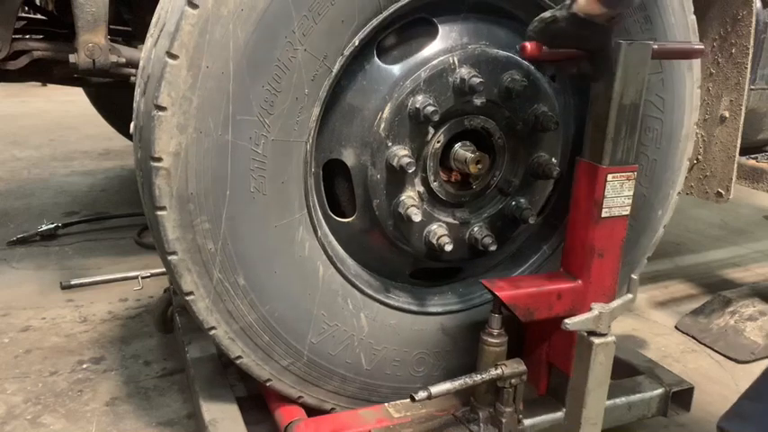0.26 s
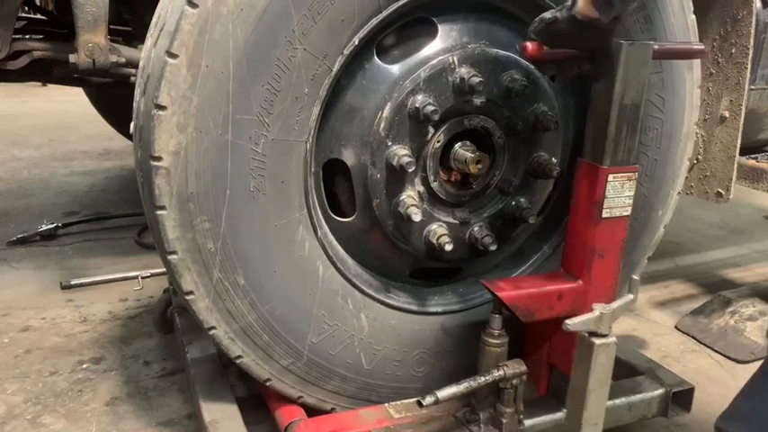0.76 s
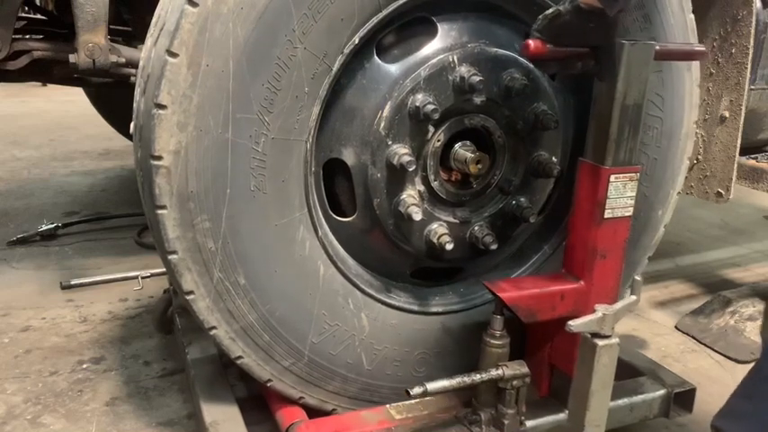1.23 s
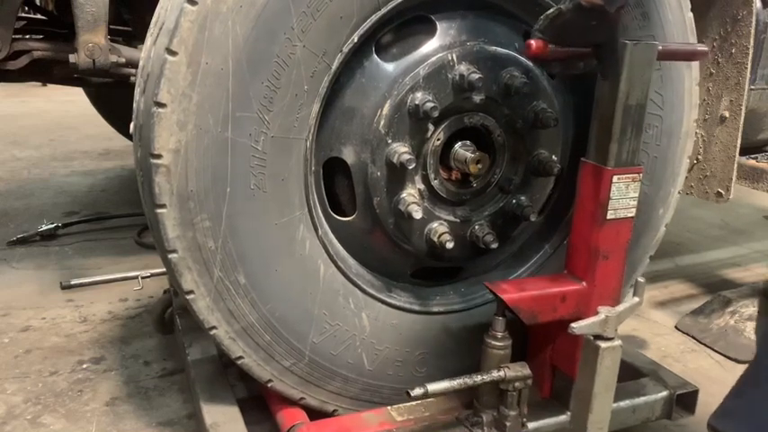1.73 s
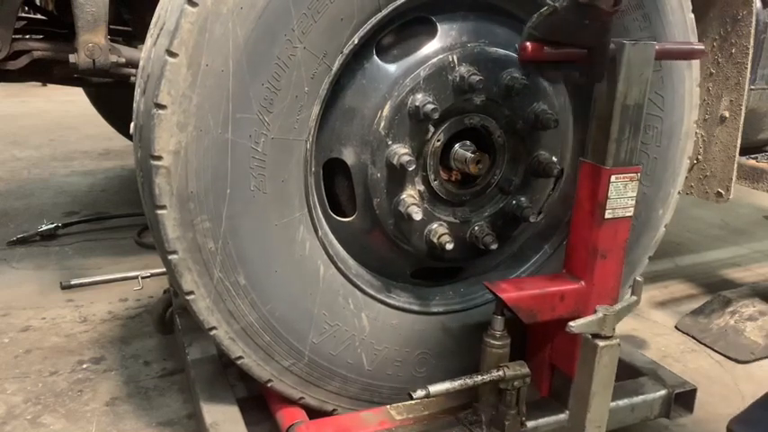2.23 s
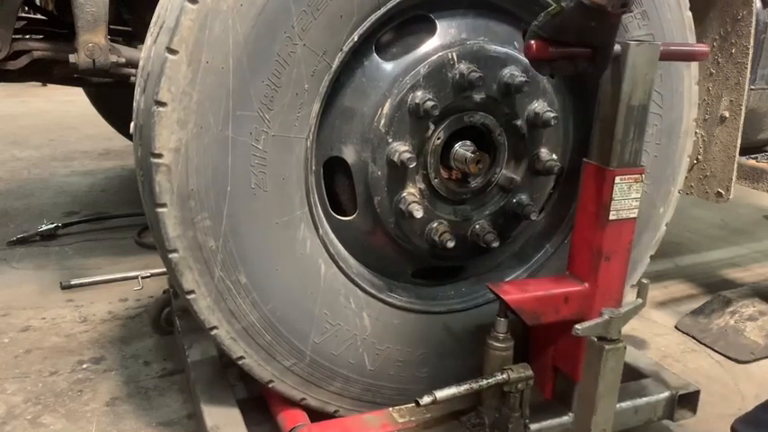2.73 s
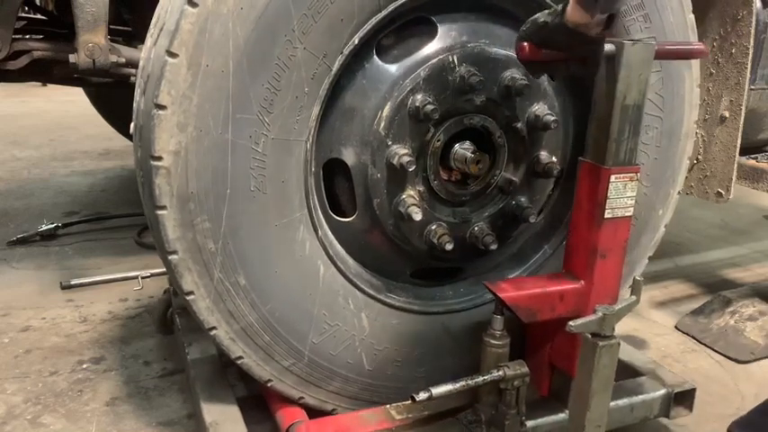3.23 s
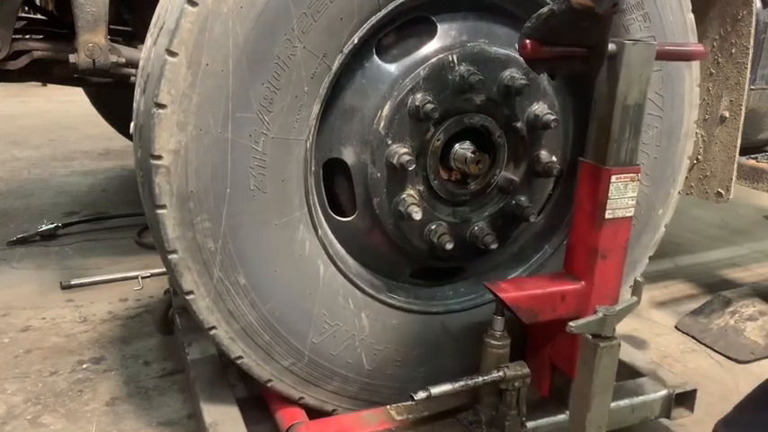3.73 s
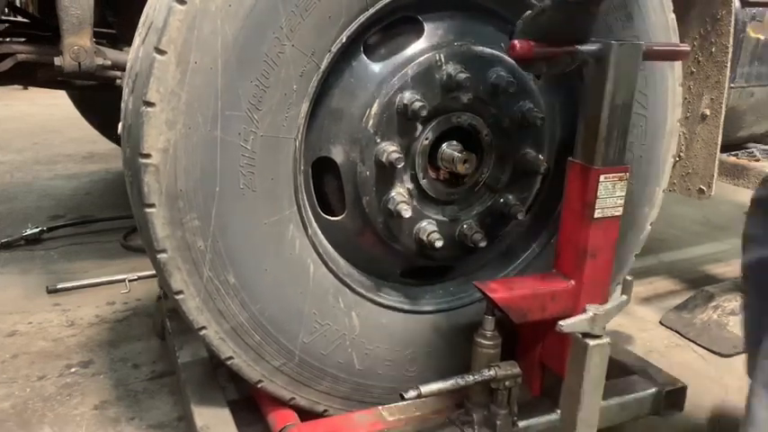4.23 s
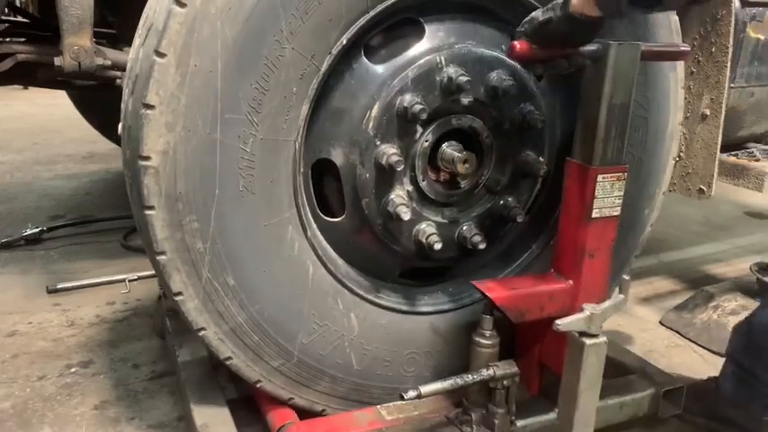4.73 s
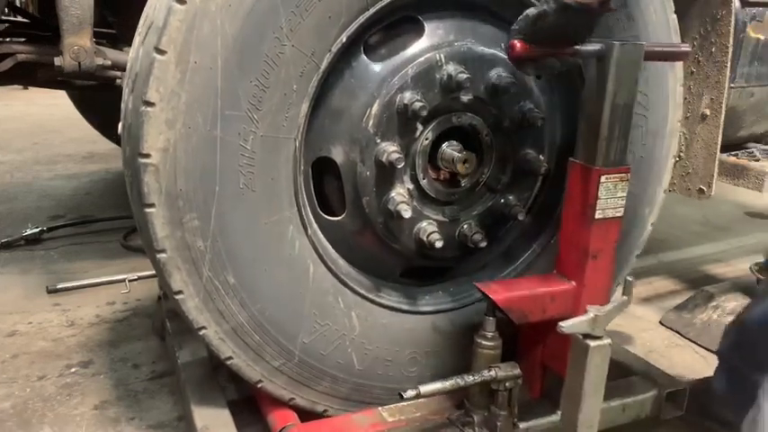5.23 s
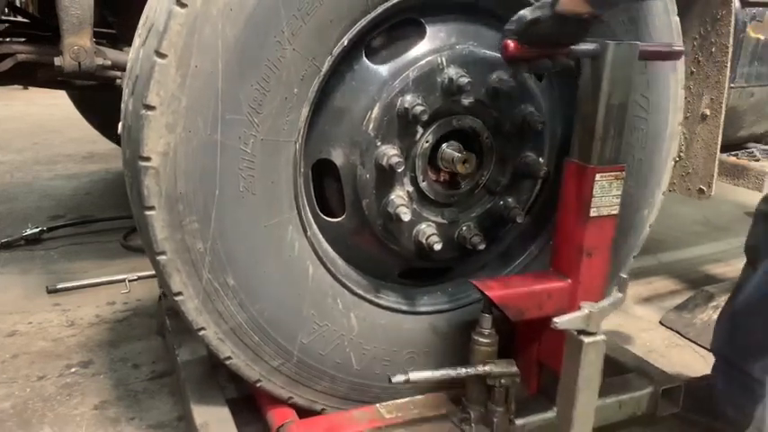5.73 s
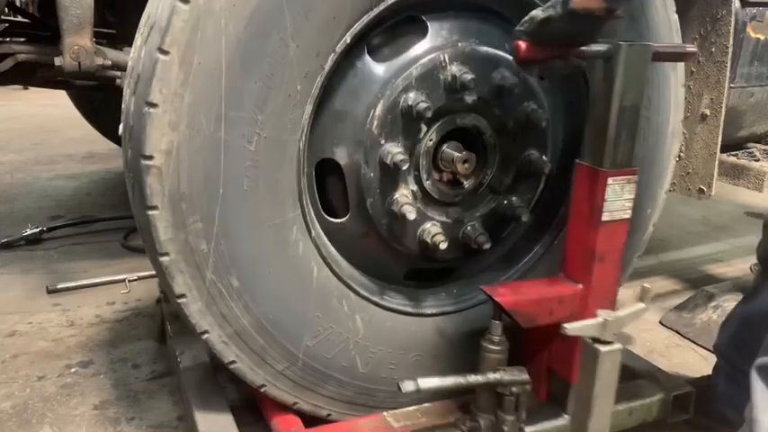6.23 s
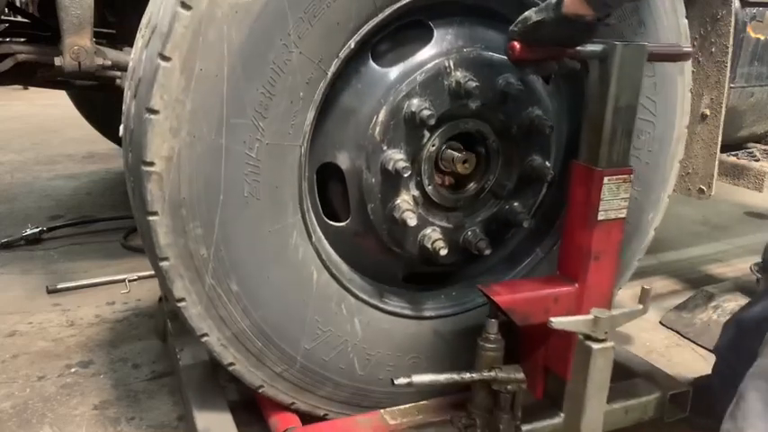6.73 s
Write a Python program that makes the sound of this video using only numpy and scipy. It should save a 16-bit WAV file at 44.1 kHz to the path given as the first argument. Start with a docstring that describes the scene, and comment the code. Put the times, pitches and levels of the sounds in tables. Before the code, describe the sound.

Close to the microphone in a reverberant workshop, a jack dolly is worked under a truck wheel. Steel linkage clanks back and forth in the first second and a half, with frame knocks, small creaks and dull tyre thuds. It nearly hushes to cloth rustle and faint hiss, then picks up from about three and a half seconds and ends in dense, hard clanks and knocks with two tiny groans.

```python
"""Truck wheel on a jack dolly

A truck wheel is worked up on a hydraulic jack dolly in a workshop, close to the microphone.
Micro-impacts excite resonances: the loose steel pump linkage clanks, the frame knocks, the big tyre thuds.
Stick-slip makes the frame creak and groan twice; shaped noise makes the tyre's boom and rustling work clothes.
The hall answers with a diffuse tail over a faint hiss, and the level dips briefly once."""
import sys
import numpy as np
from scipy import signal
from scipy.fft import rfft, irfft, next_fast_len
from scipy.io import wavfile
from scipy.ndimage import uniform_filter1d, map_coordinates

SR = 44100
rng = np.random.default_rng(int(sys.argv[2]) if len(sys.argv) > 2 else 0)


def store_wav(level_fs):
    """Save 16-bit WAV to argv[1]."""
    pcm = np.round(np.clip(np.atleast_2d(level_fs), -1, 1) * 32767)
    wavfile.write(sys.argv[1], SR, pcm.T.astype(np.int16))


N = 307377
PRE_S = .03  # room for the scrape ahead of each blow
DIP_S = 4.118  # centre of the brief level dip; the handle's joint ring and the echo stop here


def amp(db):
    """Logarithmic level: decibels to amplitude gain."""
    return 10 ** (np.asarray(db) / 20)


def unit(x):
    """Energy normalisation: scale to rms 1."""
    return x / np.sqrt(np.mean(x ** 2) + 1e-20)


def crest(x, size=700):
    """Short-time energy: scale so that the loudest moment has rms 1."""
    power = uniform_filter1d(np.mean(x ** 2, 0), size)
    return x / np.sqrt(power.max() + 1e-20)


def along(points, hz):
    """Logarithmic pitch scale: interpolate (frequency, value) points on it."""
    f, v = np.transpose(points)
    return np.interp(np.log(hz + 1), np.log(f + 1), v)


def envelope(rows):
    """Piecewise linear envelope: one value per sample from (time, value) rows."""
    s, values = np.transpose(rows)
    return np.interp(np.arange(N) / SR, s, values)


def wobble(rate, size=N):
    """Slow random modulation: a smooth curve with rate knots a second."""
    knots = rng.standard_normal(int(size * rate / SR) + 4)
    return map_coordinates(knots, [np.arange(size) * rate / SR])


def filtered(x, response):
    """Linear filtering: the spectrum of x times a complex frequency response."""
    n = x.shape[-1]
    m = next_fast_len(n + 8192)
    return irfft(rfft(x, m) * response(np.fft.rfftfreq(m, 1 / SR)), m)[..., :n]


def body(modes):
    """Modal superposition: response of (frequency, bandwidth, level) resonances of alternating sign."""
    def response(f):
        return sum((-1) ** k * amp(db) * 1j * f * width / (centre * centre - f * f + 1j * f * width)
                   for k, (centre, width, db) in enumerate(modes))
    return response


def band(x, lo_hz, hi_hz, order=3):
    """Causal Butterworth band-pass."""
    edges = [lo_hz, min(hi_hz, SR / 2 - 1)]
    return signal.sosfilt(signal.butter(order, edges, "band", fs=SR, output="sos"), x)


# left-right correlation of the sound field: (frequency [Hz], correlation [-1 to 1])
CORRELATION = [(60, 0.98), (120, 0.87), (250, 0.4), (520, 0.7), (1000, -0.63), (2200, 0.1), (4400, -0.25),
               (9000, 0.11)]


def spread(pair):
    """Interaural coherence: two unrelated signals become left and right, correlated by frequency."""
    def mid_side(hz):
        turn = np.arccos(np.clip(along(CORRELATION, hz), -1, 1)) / 2
        return np.array([np.cos(turn), np.sin(turn)])
    mid, side = filtered(pair, mid_side)
    return np.array([mid + side, mid - side])


def noise(spectrum):
    """Coloured noise: random stereo hiss of rms 1 with the given spectrum."""
    coloured = filtered(rng.standard_normal((2, N)), lambda hz: amp(along(spectrum, hz)))
    return unit(spread(coloured))


def random_gain(x, depth_db=4.5):
    """Time-frequency modulation: give noise a random gain that varies over time and frequency."""
    z = signal.stft(x, nperseg=1024)[2]
    field = uniform_filter1d(rng.standard_normal(z.shape[1:]), size=4, axis=0)
    field = uniform_filter1d(field, size=5, axis=1)
    return unit(signal.istft(z * amp(depth_db * unit(field)), nperseg=1024)[1][:, :N])


def add(track, s, sound):
    """Superposition: mix a sound into a track at time s."""
    start = max(round(s * SR), 0)
    part = track[:, start:start + sound.shape[-1]]
    part += sound[..., :part.shape[-1]]


def chatter(lead_s, t60_s, grit_db, lead_db=-16, size=12288):
    """Contact force: a scrape swells into the blow, then uneven micro-impacts decay exponentially."""
    t = np.arange(size) / SR - PRE_S
    sizes = amp(grit_db * np.repeat(rng.standard_normal(size // 32), 32))
    scrape = amp(lead_db - 20 * np.abs(t) / lead_s)  # 20 dB in each lead_s
    blow = np.clip(t / .001, 0, 1) * amp(-60 * np.maximum(t - .002, 0) / t60_s)
    return spread(rng.standard_normal((2, size)) * sizes * np.maximum(scrape, blow))


def nearest(modes, hz):
    """Modal selection: the mode that lies closest to a pitch."""
    return min(modes, key=lambda mode: abs(mode[0] - hz))


def sing(hz, t60_s, size=16384):
    """Free decay of one mode: it rings on while the chafing contact roughens its pitch and level."""
    t = np.arange(size) / SR
    chafe = np.array([wobble(70, size=size), wobble(70, size=size)])
    phase = 2 * np.pi * (hz * t + rng.random()) + .35 * chafe + np.array([[0], [1.2]])
    fade = amp(2.5 * chafe[::-1] - 60 * t / t60_s)
    onset = 1 - np.exp(-t / .003)
    return crest(np.sin(phase) * fade * onset)


# linkage blows: (time [s], stop it hits, bite level [dB], body level [dB], edge level [dB],
# scrape-in level [dB], favoured pitch [Hz], level of its ring [dB])
CLANKS = [(0.0812, "front", -60, -53.5, -61.5, 6, 3130, -86),
          (0.3736, "back", -45.5, -43.5, -63, -13, 3270, -67),
          (0.7235, "front", -28, -39, -39.5, -7.5, 3930, -48),
          (0.8607, "back", -28, -33.5, -39, 5, 2340, -52),
          (1.0868, "front", -28.5, -32.5, -40.5, -1, 4130, -38),
          (1.206, "back", -27, -35, -40.5, 3, 2420, -55), (1.4499, "back", -43, -44, -57, 1, 2580, -56),
          (2.7749, "back", -63, -54, -82, -11, 2360, -70),
          (3.288, "front", -52.5, -51, -60.5, -3, 2386, -71),
          (3.69, "back", -40, -41, -51.5, -15, 3260, -55),
          (3.8817, "front", -32, -38.5, -47.5, -11, 2540, -46.5),
          (4.0362, "back", -34.5, -39, -55.5, -9, 3356, -49),
          (4.796, "back", -42.5, -38, -54, -14, 2480, -69),
          (5.133, "back", -45, -43.5, -56, -16, 3620, -64),
          (5.45, "front", -36.5, -39, -55, -24, 3270, -54),
          (5.647, "back", -26, -26.5, -32.5, -7, 2540, -41),
          (5.8692, "back", -22.5, -31, -32.5, -3.5, 3800, -38.5),
          (6.0729, "front", -22, -33, -34, -12, 3300, -40),
          (6.1407, "back", -36, -24.5, -27, -9.5, 3187, -47),
          (6.332, "back", -24, -32.5, -34, -4.5, 3610, -27.5),
          (6.6495, "back", -35, -37.5, -56.5, -3, 3050, -53),
          (6.952, "front", -22, -35, -33, -19, 3735, -30)]
# linkage resonances before the shifts of each blow:
# (frequency [Hz], bandwidth [Hz], level at front stop [dB], level at back stop [dB])
LINKAGE = [(820, 52, 4.5, 3), (1260, 88, 0.5, 2.5), (1465, 350, -9, -9.5), (2173, 40, -14, -6),
           (2303, 39, -9, -4.5), (2540, 105, 2.5, 2.5), (3050, 216, -1, 0), (3370, 64, 6, 5.5),
           (3620, 80, 4, 2), (3865, 240, 0.5, -1), (4390, 95, -22, -9.5), (4743, 67, -7.5, -7),
           (5570, 120, -17, -8.5), (6010, 190, -9, -7), (6260, 150, -5, -8.5), (6580, 55, -6, -11),
           (6880, 180, -19.5, -17), (7220, 110, -10.5, -9), (8620, 180, -13, -9.5)]
# long ringing modes of the steel handle: (frequency [Hz], level [dB], free t60 [s])
HANDLE = [(2138, -10, .6), (2360, -9, .6), (2454, -9, .6), (2537, -4, .6), (2620, -9, .5), (2980, -10, .6),
          (3187, -4, .6), (3355, -4, .55), (3420, -7, .55), (3560, -9, .6), (3634, -1, .55), (3820, -7, .4),
          (3930, -8, .12), (4430, -22, .6), (4710, -14, .6), (4785, -14, .5), (5520, -20, .45),
          (5630, -19, .5), (6070, -17, .5), (7180, -19, .45)]
# body, bite and edge ranges of a clank, in that order: (low edge [Hz], high edge [Hz])
CLANK_RANGES = [(600, 2320), (2000, 4190), (4400, 7590)]
SCRAPE_S, CLANK_T60_S = 0.0097, 0.061  # the scrape into each clank and the rattle after it
LOOSE = .007  # spread of the share by which the slack joint shifts its resonances
HANDLE_DB = -24.5  # ring of all the handle's modes, relative to the bite
GRIP_DAMPING = .42  # share of its free ring time that the favoured mode keeps


def clanks():
    """Impact excitation: the linkage rattles on its stops; the harder the bite, the louder the handle rings."""
    out, t = np.zeros((2, N)), np.arange(SR) / SR
    hz, level, life = np.transpose(HANDLE)[:, :, None]
    fade = amp(level - 60 * t / life) * (1 - np.exp(-t / 0.0035))
    sine = fade * np.sin(2 * np.pi * hz * t)
    cosine = fade * np.cos(2 * np.pi * hz * t)
    for s, stop, bite_db, body_db, edge_db, scrape_db, pitch_hz, ring_db in CLANKS:
        modes = []
        for centre, width, front_db, back_db in LINKAGE:
            stop_db = front_db if stop == "front" else back_db
            # the point of contact favours the resonances around one pitch
            favour_db = 4 * np.exp(-((centre - pitch_hz) / 450) ** 2)
            shifted_hz = centre * (1 + LOOSE * rng.normal())
            modes.append((shifted_hz, width, stop_db + favour_db + rng.normal(0, 1.88)))
        force = chatter(SCRAPE_S, CLANK_T60_S, grit_db=3.8, lead_db=scrape_db)
        steel = filtered(force, lambda f: body(modes)(f) + amp(-17))
        for db, edges in zip([body_db, bite_db, edge_db], CLANK_RANGES):
            add(out, s - PRE_S, amp(db) * crest(band(steel, *edges, order=4)))
        ring = rng.standard_normal((2, len(hz))) @ sine + rng.standard_normal((2, len(hz))) @ cosine
        heard = (s > DIP_S) | (s + t < DIP_S)  # the joint ring of all modes stops at the dip
        add(out, s, amp(bite_db + HANDLE_DB) * crest(ring) * heard)
        mode_hz, _, t60_s = nearest(HANDLE, pitch_hz)
        add(out, s, amp(ring_db) * sing(mode_hz, GRIP_DAMPING * t60_s))
    return out


# light touches of loose parts: (time [s], level [dB])
TICKS = [(0.825, -45.5), (1.514, -54), (1.5674, -51), (2.492, -67), (2.592, -55.5), (4.2485, -56.5),
         (4.668, -58), (5.67, -45), (5.705, -43.5), (5.7502, -43.5), (5.9083, -46.5), (6.204, -52),
         (6.2552, -52), (6.5899, -46), (6.7987, -41.5), (6.8326, -44)]


def ticks():
    """Light contact: small parts touch in brief, bright bursts of micro-impacts."""
    out = np.zeros((2, N))
    for s, db in TICKS:
        force = chatter(0.0021, 0.08, grit_db=0)
        add(out, s - PRE_S, amp(db) * crest(band(force, 810, 7240)))
    return out


# frame blows: (time [s], level [dB], favoured pitch [Hz], rattle t60 [s], level of the singing mode [dB])
KNOCKS = [(0.221, -40, 788, .037, -58), (0.734, -49, 820, 0.28, -41), (0.803, -36.5, 720, 0.1, -63),
          (0.8267, -36, 957, 0.052, -48), (0.843, -39, 1005, 0.047, -45), (0.856, -37, 830, 0.029, -38.5),
          (1.089, -46, 820, .04, -64), (1.452, -48, 800, 0.1, -47), (1.514, -41.5, 720, 0.08, -64),
          (1.538, -46.5, 760, 0.044, -55), (1.562, -63, 780, 0.037, -72), (1.69, -60, 810, 0.037, -68),
          (2.212, -55, 800, 0.072, -66), (2.391, -65, 1170, .067, -73), (2.495, -62, 780, 0.028, -62),
          (2.525, -59, 640, 0.1, -70), (2.617, -54.5, 750, 0.042, -69), (2.776, -59.5, 715, 0.2, -68),
          (3.288, -41.5, 636, 0.17, -48.5), (3.33, -62, 1280, .14, -59), (3.439, -63.5, 1100, .07, -60.5),
          (4.24, -64.5, 640, 0.034, -78), (4.267, -53, 900, 0.054, -76), (4.668, -54.5, 800, 0.085, -68),
          (4.797, -43, 820, 0.037, -63), (4.834, -46, 860, 0.11, -62), (4.972, -49.5, 690, 0.18, -53.5),
          (5.054, -51, 790, 0.043, -54.5), (5.325, -54, 710, 0.083, -67), (5.565, -50.5, 615, 0.087, -54),
          (5.669, -31.5, 1340, 0.025, -52.5), (5.675, -26, 1200, 0.029, -56),
          (5.749, -38.5, 1410, .06, -55), (5.756, -39.5, 800, 0.068, -59), (5.777, -35, 1300, 0.065, -55),
          (5.796, -37.5, 718, 0.037, -48), (5.93, -33.5, 1000, .05, -46),
          (5.938, -31.5, 1200, 0.031, -42.5), (6.022, -43.5, 820, .04, -54), (6.144, -25, 1200, 0.019, -42),
          (6.16, -33, 937, 0.049, -41), (6.171, -31.5, 1000, 0.036, -42), (6.185, -38, 1400, .04, -46),
          (6.204, -38, 1250, .05, -45), (6.257, -40, 1000, .04, -44.5), (6.371, -40, 820, .04, -48),
          (6.386, -28, 1180, 0.075, -40), (6.415, -33, 1150, 0.032, -59), (6.431, -40, 1200, 0.029, -61),
          (6.7745, -40, 794, .067, -51), (6.803, -38.5, 824, .03, -51), (6.831, -41.5, 797, 0.13, -53)]
# resonances of the frame and rim: (frequency [Hz], bandwidth [Hz], level [dB])
FRAME = [(680, 40, -10), (765, 22, -6), (822, 16, 0), (920, 14, -1), (966, 14, -3), (995, 12, 1),
         (1024, 12, -2), (1180, 24, -6), (1222, 14, 3), (1287, 18, -5), (1410, 20, 0), (1440, 22, -1),
         (1510, 50, -18)]
FAVOUR_WIDTH_HZ = 280  # how wide a range of frame modes one knock reaches
FRAME_SING_S = .22  # t60 of the frame mode that sings on


def knocks():
    """Modal excitation: the pitch favoured by a blow selects which frame resonances speak and which sings on."""
    out = np.zeros((2, N))
    for s, db, pitch_hz, t60_s, ring_db in KNOCKS:
        force = chatter(0.019, t60_s, grit_db=1.0)
        favour = body([(pitch_hz, FAVOUR_WIDTH_HZ, 0)])
        ring = filtered(force, lambda f: (body(FRAME)(f) + amp(-0.5)) * favour(f))
        add(out, s - PRE_S - .002, amp(db) * crest(band(ring, 333, 1490, order=5)))
        add(out, s, amp(ring_db) * sing(nearest(FRAME, pitch_hz)[0], t60_s=FRAME_SING_S))
    return out


# strained joints: (time [s], length [s], level [dB], mean pitch [Hz], overtone level [dB], share of grain [0-1])
CREAKS = [(0.149, 0.063, -55, 1220, -9, 0.8), (0.176, 0.073, -49.5, 829, -4, 0.5),
          (0.221, 0.031, -35.5, 796, -24, 0.14), (0.559, 0.11, -46.5, 1210, -33, 0.8),
          (0.581, .024, -45, 1260, -20, 0.26), (0.828, .045, -38, 1310, -20, 0),
          (1.51, 0.057, -50, 810, -22, 0.4), (2.945, 0.042, -59, 1260, -12, 1),
          (3.121, 0.23, -70, 824, -14, 0.33), (3.431, 0.033, -57, 1230, -16, 0.75),
          (3.55, 0.1, -61, 825, -7, 0.3), (5.694, .022, -33, 1005, -23, 0.2),
          (5.722, .045, -39.5, 1010, -28, 0), (6.141, 0.028, -23.5, 1447, -29, 0.36),
          (6.448, .075, -41.5, 1025, -32, 0.53)]
OVERTONE_RATIO = 1.8  # the second bending mode over the first
SAG, ROUGHNESS_RAD = 0.017, 0.47  # share of pitch lost over a creak, and its phase flutter
SLIPS_PER_S, SLIP_WIDTH_HZ = 380, 60  # mean pace of the catches, and the width of the modes they strike


def creaks():
    """Stick-slip: a joint slips unevenly on two bending modes, or locks into a tone that sags as strain eases."""
    out = np.zeros((2, N))
    for s, length, db, pitch_hz, overtone_db, grain in CREAKS:
        size = int(length * SR) + SR // 20
        u = np.minimum(np.arange(size) / SR / length, 1)
        swell = np.sin(np.pi * np.sqrt(u))
        flutter = np.array([wobble(110, size=size), wobble(110, size=size)])
        sagging_hz = pitch_hz * (1 + SAG * (.5 - u))
        phase = 2 * np.pi * np.cumsum(sagging_hz) / SR + ROUGHNESS_RAD * flutter
        partials = np.sin(phase) + amp(overtone_db) * np.sin(OVERTONE_RATIO * phase)
        tone = swell * partials * amp(3.2 * flutter[::-1])
        catches = (np.cumsum(rng.exponential(size=160)) * SR / SLIPS_PER_S).astype(int)
        force = swell * np.bincount(catches, minlength=size)[:size] * rng.standard_normal((2, size))
        modes = [(pitch_hz, SLIP_WIDTH_HZ, 0), (OVERTONE_RATIO * pitch_hz, SLIP_WIDTH_HZ, overtone_db)]
        slips = band(filtered(force, body(modes)), .7 * pitch_hz, 1600)
        add(out, s, amp(db) * crest((1 - grain) * unit(tone) + grain * unit(slips), size=400))
    return out


# drops of the wheel in its cradle: (time [s], boom level [dB], hollow level [dB])
THUDS = [(0.081, -47.5, -44), (0.189, -42.5, -45.5), (0.377, -89, -46), (0.52, -38, -49.5),
         (0.73, -35, -45), (0.922, -40.5, -45), (1.089, -38, -40), (1.424, -39, -44), (1.453, -41, -48),
         (1.529, -53, -50), (2.215, -58, -57), (2.524, -38.5, -51.5), (3.29, -73, -47.5), (3.379, -44, -56),
         (3.724, -40, -42), (4.24, -42, -46), (4.273, -51, -67), (4.8, -55, -44), (4.846, -59, -48.5),
         (5.132, -46.5, -53.5), (5.456, -57, -46.5), (5.563, -45.5, -43.5), (5.672, -50, -36.5),
         (5.796, -35.5, -32.5), (5.884, -46, -40), (5.935, -61, -38.5), (6.024, -37, -36),
         (6.156, -30.5, -24), (6.203, -39, -36.5), (6.376, -45, -35.5), (6.562, -40, -50),
         (6.774, -38.5, -38.5), (6.956, -60, -41)]
# resonances of the wheel in its cradle: (frequency [Hz], bandwidth [Hz], level [dB])
WHEEL = [(108, 25, 1), (166, 10, 7), (245, 35, -8), (321, 20, 1), (362, 25, -6), (421, 13, 3), (490, 40, 1),
         (525, 30, -7), (660, 60, -17)]
THUD_T60_S = 0.062  # how long the wheel chatters after a drop
CONTACT_DB = -15.5  # the hard tap of the cradle, relative to the hollow knock
CAVITY_HZ, CAVITY_T60_S = 166, .4  # the air inside the tyre
CAVITY_DB = -9.5  # peak of its hum, relative to the boom's level


def thuds():
    """Impact and cavity resonance: each drop booms, knocks hollow and taps hard, then the tyre's air hums."""
    out = np.zeros((2, N))
    t = np.arange(SR // 2) / SR
    for s, boom_db, hollow_db in THUDS:
        force = chatter(0.0028, THUD_T60_S, grit_db=3)
        modes = [(c, w, db + rng.normal(0, 2.5)) for c, w, db in WHEEL]  # never the same spot
        wheel = filtered(force, lambda f: body(modes)(f) + amp(-6))
        boom = amp(boom_db) * crest(band(wheel, 68, 250, order=2))
        hollow = amp(hollow_db) * crest(band(wheel, 303, 498))
        tap = amp(hollow_db + CONTACT_DB) * crest(band(force, 588, 990))
        add(out, s - PRE_S - .002, boom + hollow + tap)
        hum = np.sin(2 * np.pi * CAVITY_HZ * t)
        add(out, s, amp(boom_db + CAVITY_DB - 60 * t / CAVITY_T60_S) * hum)
    return out


# short slips of the load: (time [s], length [s], first slip rate [Hz], last slip rate [Hz], level [dB])
GROANS = [(5.792, 0.0174, 420, 287, -25.5), (6.1563, 0.023, 471, 500, -17)]


def groans():
    """Periodic stick-slip: steel slips for a few cycles with fading harmonics, then grips again at once."""
    out = np.zeros((2, N))
    for s, length, first_hz, last_hz, db in GROANS:
        t = np.arange(int(length * SR)) / SR
        rate_hz = first_hz + (last_hz - first_hz) * t / length
        phase = 2 * np.pi * np.cumsum(rate_hz) / SR + np.array([[.2], [-.2]])  # the left leads
        harmonics = 0.91 * np.sin(2 * phase) + 0.44 * np.sin(3 * phase)
        slips = np.sin(phase) + np.exp(-t / 0.0053) * harmonics
        add(out, s, amp(db) * unit(slips * signal.windows.tukey(len(t), .4)))
    return out


# rocking of the tyre, before the boom's gain: (time [s], level [dB])
ROCKING = [(0.0, -54), (0.21, -40), (0.49, -45), (1.16, -39), (1.65, -41.5), (1.75, -55), (1.82, -46.5),
           (2.45, -51), (2.68, -42), (3.03, -52.5), (3.49, -41.5), (3.71, -48.5), (3.75, -40),
           (4.04, -43.5), (4.08, -52.5), (4.72, -43.5), (4.78, -54), (4.97, -45), (5.69, -47.5),
           (5.71, -39.5), (6.25, -39.5), (6.76, -46), (6.87, -35.5), (6.97, -53)]
# rolling on the cradle, the reference for tread, loose parts and sleeves: (time [s], level [dB])
ROLLING = [(0.0, -58.5), (0.33, -51.5), (0.58, -61), (1.03, -51), (1.2, -45), (1.55, -69), (1.71, -65),
           (3.03, -65.5), (3.88, -60.5), (4.08, -48.5), (4.15, -53), (4.62, -80), (4.85, -52),
           (5.45, -57.5), (5.88, -38), (6.06, -36.5), (6.25, -40), (6.41, -45), (6.97, -51)]
# colour of the tyre's boom: (frequency [Hz], spectrum level [dB])
BOOM_COLOUR = [(13, -58), (22, 3), (38, -4), (59, 3), (134, -16), (168, -20), (200, -15.5), (260, -52),
               (440, -120)]
# colour of the rolling tread: (frequency [Hz], spectrum level [dB])
TREAD_COLOUR = [(41, -17), (70, -5), (269, -28), (478, -21.5), (566, -42.5), (781, -20.5), (925, -49),
                (1290, -49.5), (2000, -30), (2600, -87), (4400, -120)]
BOOM_DB, BOOM_BEAT_DB, BOOM_KNOTS_PER_S = 3.5, 2.5, 7.5  # gain, and depth and pace of its random beating
TREAD_DB = -1  # relative to the rolling


def tyre():
    """Resonance under noise: the rocking tyre booms and beats unevenly; its tread stirs the wheel's modes."""
    boom = unit(filtered(noise(BOOM_COLOUR), lambda f: 1 + abs(body([(53, 7, 4)])(f))))  # lowest mode
    swell = np.sqrt(abs(uniform_filter1d(np.mean(boom ** 2, 0), size=6000)) + 1e-6)
    boom_db = envelope(ROCKING) + BOOM_DB + BOOM_BEAT_DB * wobble(BOOM_KNOTS_PER_S)
    steady = boom / swell  # its own swells are evened out first
    deep = filtered(amp(boom_db) * steady, lambda f: f ** 10 / (f ** 10 + 32 ** 10))
    tread = band(noise(TREAD_COLOUR), 100, 1600, order=2) * amp(4 * wobble(28))
    roll = unit(filtered(tread, lambda f: 1.5 + abs(body(WHEEL)(f))))
    return deep + amp(envelope(ROLLING) + TREAD_DB) * roll


def rattle():
    """Random impulse train: sparse tiny contacts tap the frame, louder while the wheel rolls."""
    struck = rng.random(N) < 60 / SR  # about 60 taps a second
    taps = struck * amp(rng.uniform(-15, 0, N)) * rng.choice([-1, 1], (2, N))
    frame = filtered(spread(taps), lambda f: body(FRAME)(f) + amp(-8))
    return amp(envelope(ROLLING) - 13) * unit(band(frame, 550, 2000))  # 13 dB under the rolling


# brushes of work clothes: (time of peak [s], peak level [dB], rise over 20 dB [s], fall over 20 dB [s])
BRUSHES = [(1.88, -58.5, 0.15, .2), (2.13, -49, 0.41, 0.2), (2.38, -57.5, 0.38, 0.076),
           (4.24, -60.5, 0.38, 1), (4.98, -51, 0.51, 0.3), (5.76, -51.5, 0.54, .5), (6.2, -53, .4, .4),
           (6.82, -50, 0.19, 0.54)]
# colour of rubbed cloth: (frequency [Hz], spectrum level [dB])
CLOTH_COLOUR = [(240, -41.5), (400, -4.5), (488, -4.5), (543, -19.5), (777, -12.5), (1100, -15.5),
                (1300, -7), (1720, -17), (2460, -12), (6320, -15.5), (8580, -28), (9540, -27),
                (12400, -72.5), (21000, -120)]
SLEEVE_DB = -11  # relative to the rolling
FIBRE_HZ, DRAG_GROWTH = 2800, 0.69  # top of the drag range, and the power by which drag outgrows the hiss


def rustle():
    """Friction noise: sleeves stir and moves swell into brushes; light rubbing hisses, hard rubbing also drags."""
    t = np.arange(N) / SR
    moves = [amp(db - 20 * np.maximum((s - t) / rise, (t - s) / fall)) for s, db, rise, fall in BRUSHES]
    rubbing = np.max(moves + [amp(envelope(ROLLING) + SLEEVE_DB)], axis=0)
    cloth = random_gain(noise(CLOTH_COLOUR))

    def drag_range(f):
        return f ** 4 / (f ** 4 + 700 ** 4) * FIBRE_HZ ** 6 / (f ** 6 + FIBRE_HZ ** 6)
    drag = filtered(cloth, drag_range)
    pressure = np.minimum(rubbing / amp(-55), 1) ** DRAG_GROWTH * amp(1.7 * wobble(7.2))
    flicker = amp(0.76 * wobble(25) + 1.3 * wobble(180))
    return rubbing * flicker * (cloth + (pressure - 1) * drag)


# colour of the background hiss: (frequency [Hz], spectrum level [dB])
HISS_COLOUR = [(100, -13), (190, -11.5), (400, -19.5), (850, -33.5), (1900, -45), (3200, -28), (4800, -36),
               (7200, -29.5), (8600, -46), (9600, -37.5), (12300, -25.5), (14000, -100)]


def hiss():
    """Stationary background noise: a faint, steady hiss with random uneven gain in time and frequency."""
    return amp(-57.5) * random_gain(noise(HISS_COLOUR))


# reverberation time of the hall: (frequency [Hz], t60 [s])
HALL_T60 = [(100, 0.33), (500, 0.46), (1200, 0.29), (3000, 0.82), (6000, 0.69), (10000, 0.36)]
HALL_PIECE_S = .3  # each piece of sound this long gets a new random tail


def hall(x):
    """Diffuse reverberation: an uneven, ever-new noise tail in which each frequency dies at its own speed."""
    out, step = np.zeros(x.shape), round(HALL_PIECE_S * SR)
    for start in range(0, x.shape[1], step):
        hz, t, z = signal.stft(rng.standard_normal((2, 30000)), SR, nperseg=2048)
        uneven = amp(3 * rng.standard_normal((len(hz), 1)))
        decay = amp(-60 * t / along(HALL_T60, hz)[:, None])
        tail = spread(signal.istft(z * uneven * decay, SR, nperseg=2048)[1])
        tail *= 1 - np.exp(-np.arange(tail.shape[1]) / SR / 0.0055)
        tail /= np.linalg.norm(tail[0])
        add(out, start / SR, signal.fftconvolve(x[:, start:start + step], tail, axes=1))
    return out


# how much the hall answers linkage, frame, wheel and groans, in that order: (level [dB])
ECHO_LEVELS = [-9.5, -11, -6.5, -29]
# the linkage as the hall hears it: (frequency [Hz], gain [dB])
FAR_COLOUR = [(700, 1.5), (1300, -0.5), (2100, 6), (2550, -3.5), (2790, 0.5), (3050, -1), (3400, -0.5),
              (3900, -5.5), (4400, 2), (6000, 1.5), (8000, 2.5)]
# stereo balance of the whole scene: (frequency [Hz], left over right [dB])
BALANCE = [(60, -1.5), (100, 0), (300, -1), (560, 3.5), (1100, -4), (1700, -1.5), (3000, 0), (5200, 1),
           (8500, -5)]
FRAME_BALANCE_DB = -0.5  # left over right: the frame stands slightly to the right


def scene():
    """Superposition of direct and diffuse sound; the echo stops short at the level dip."""
    frame_pan = amp(np.array([[FRAME_BALANCE_DB], [-FRAME_BALANCE_DB]]) / 2)
    frame = (knocks() + creaks()) * frame_pan
    linkage, others = clanks() + ticks(), [frame, thuds(), groans()]
    far = filtered(linkage, lambda hz: amp(along(FAR_COLOUR, hz)))
    sent = sum(amp(db) * part for db, part in zip(ECHO_LEVELS, [far] + others))
    echo = np.hstack([hall(piece) for piece in np.split(sent, [round(DIP_S * SR)], axis=1)])
    mix = linkage + sum(others) + echo + rattle() + tyre() + rustle() + hiss()
    return filtered(mix, lambda hz: amp(np.array([along(BALANCE, hz), -along(BALANCE, hz)]) / 2))


def record(dry):
    """Gain dip and transducer response: the level dips briefly once; the microphone rolls off in the top
    treble."""
    colour = [(7000, -2.0), (8700, -1.0), (9600, -12.0), (12000, -29.5)]  # (frequency [Hz], gain [dB])
    t = np.arange(N) / SR
    dip = amp(-13 * np.exp(-((t - DIP_S) / .017) ** 2))  # 13 dB deep
    dulled = filtered(dry * dip, lambda hz: amp(along(colour, hz)))
    return filtered(dulled, lambda hz: hz < 12300)  # nothing above this pitch


dry = scene()
out = record(dry)
store_wav(out)
```